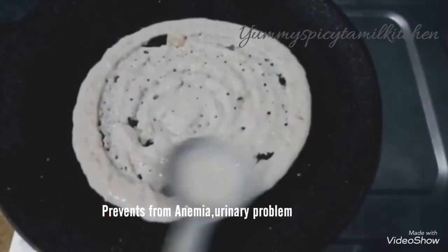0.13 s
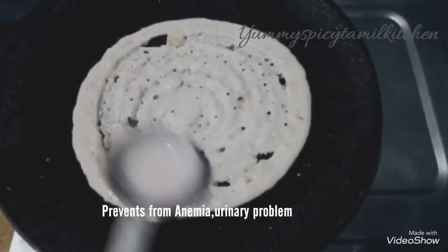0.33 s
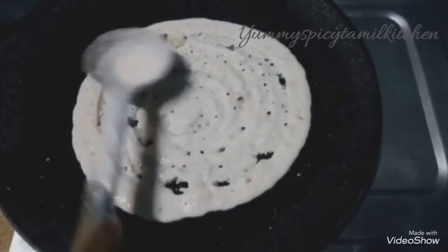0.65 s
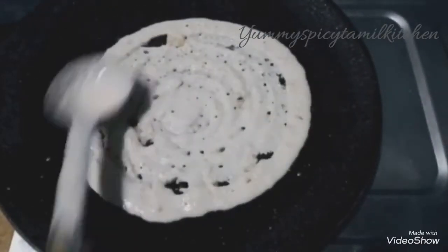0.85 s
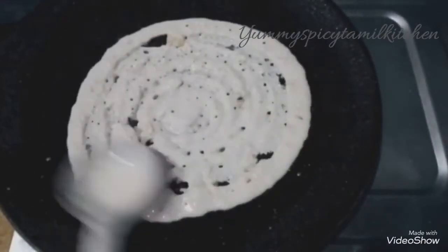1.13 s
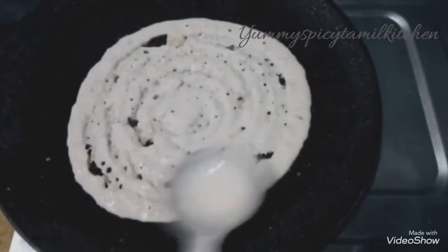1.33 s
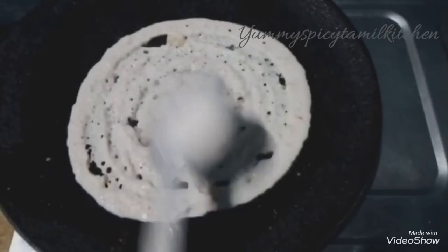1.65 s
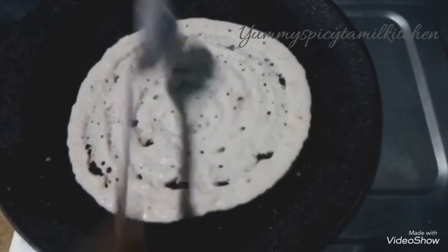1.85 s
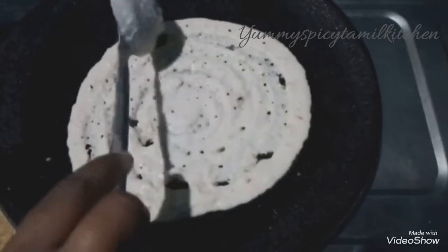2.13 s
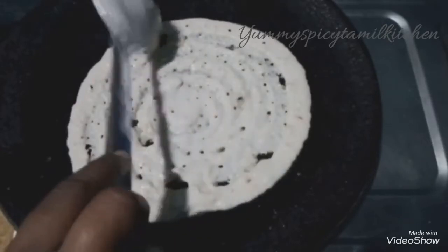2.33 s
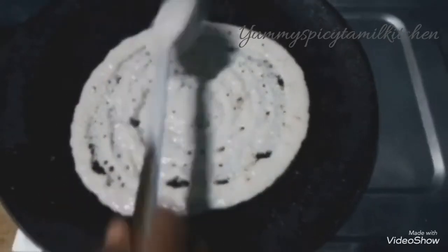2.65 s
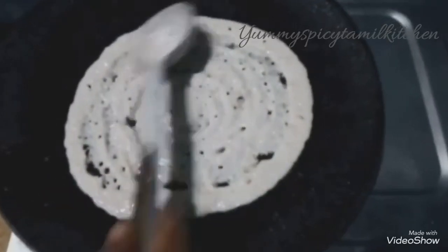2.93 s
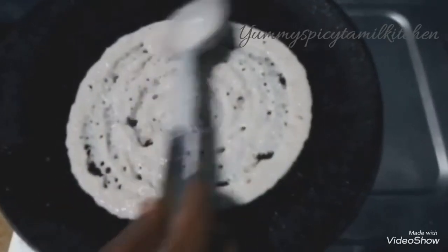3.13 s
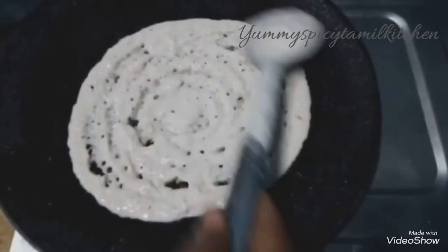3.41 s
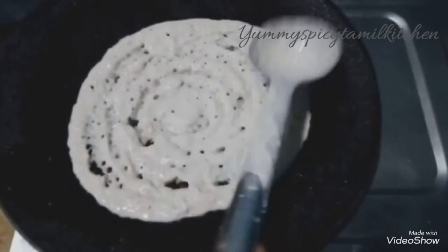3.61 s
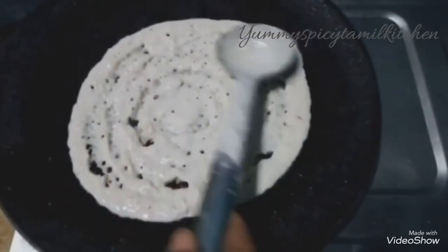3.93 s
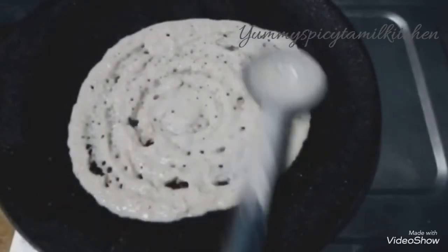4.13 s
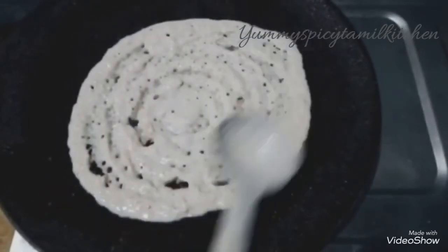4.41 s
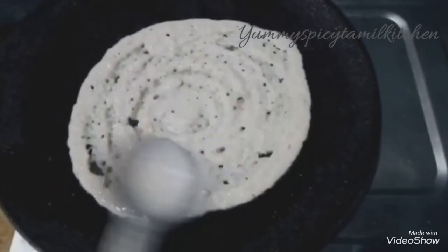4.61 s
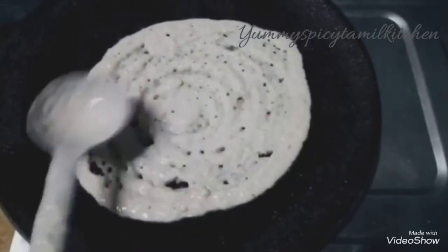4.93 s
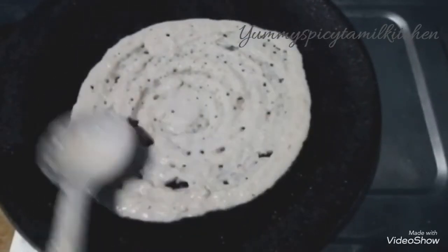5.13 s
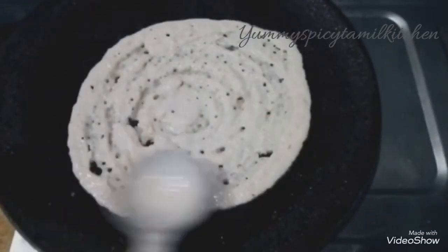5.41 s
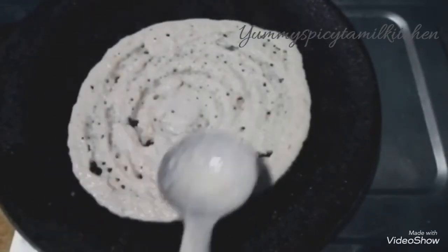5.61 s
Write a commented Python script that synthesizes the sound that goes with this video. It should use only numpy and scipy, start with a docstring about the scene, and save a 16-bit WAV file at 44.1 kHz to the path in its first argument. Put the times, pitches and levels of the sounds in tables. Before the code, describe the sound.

Wet batter sizzles on a hot flat pan, heard close in a kitchen: a dense, bright crackle of tiny bursting bubbles, dotted with sharp spits, over a faint low hum and rumble. It is strongest for the first second and a half, while a ladle spreads the batter in soft, wet, circling strokes and thin hisses swell and fade. At about 2 seconds the ladle comes to rest with a very soft, low rubbing groan and a short hiss. The sizzle then eases as the batter sets, breaking into separate pops, with brief lulls and flares between 3.4 and 4 seconds, where it dips low. Just after 4 seconds the ladle circles again, ringing softly as it rubs, and the sizzle revives. From about 5.2 seconds it sinks away with a few last spits, ending near 5.8 seconds.

```python
'''Close by in a kitchen, wet batter sizzles on a hot flat pan: thousands of tiny steam bubbles burst
each second, in clumps, over a faint hum and rumble. A ladle spreads it in circles while thin hisses
swell and fade, then rests with a soft groan at two seconds. The sizzle eases as the batter sets,
with spits, brief lulls and flares where it is pushed onto bare metal. After four seconds the ladle
circles again, ringing softly as it rubs, and the sizzle revives, then sinks away.'''
import sys
import numpy as np
from scipy import signal
from scipy.fft import rfft, irfft
from scipy.io import wavfile
from scipy.ndimage import uniform_filter1d

SR = 44100
rng = np.random.default_rng(int(sys.argv[2]) if len(sys.argv) > 2 else 0)


def transcribe(signal):
    """Save signal, clipped to [-1, 1], as a 16-bit WAV file at the path in sys.argv[1]."""
    frames = np.atleast_2d(signal).T
    limited = np.clip(frames, -1, 1)
    pcm = np.round(limited * 32767).astype(np.int16)
    wavfile.write(sys.argv[1], SR, pcm)


N = 254400
TIME = np.arange(N) / SR
CALM_DB = -40  # level of a calm sizzle

# The sizzle's slow envelope. Each row: time in seconds, level in dB.
SIZZLE_ENVELOPE = [(0, -35), (1.3, -36), (1.68, -38.5), (2.35, -38.5), (2.9, -41), (3.5, -41.5),
                   (3.68, -45.5), (3.87, -44), (3.98, -48), (4.35, -40), (4.72, -40.5), (4.91, -42.3),
                   (5.14, -41), (5.25, -43.5), (5.72, -44.5), (5.77, -50)]
# Tone of a bursting bubble. Each row: frequency in Hz, gain in dB.
BURST_EQ = [(150, -16.5), (450, -17), (700, -12), (1000, -7.5), (1400, -6), (1950, -5), (2400, -2.5),
            (4600, -0.5), (6700, 1), (7050, -1.5), (8100, -8), (12000, -11.5), (13700, -16), (14700, -9),
            (16000, -8)]
# Pan and stove colour every burst. Each row: centre in Hz, width in Hz, gain in dB.
PAN_RESONANCES = [(520, 20, 2), (929, 30, 5), (1117, 21, 3.5), (1400, 114, 4), (1550, 150, 3.5),
                  (1730, 120, 2.5), (2173, 53, 3), (2326, 99, 2), (2626, 360, 2.5), (2920, 87, 0.5),
                  (3220, 80, 0.5), (3713, 59, 4), (3960, 68, 1), (5560, 40, -2)]
# The finest spray, above 8 kHz. Each row: time in seconds, lift in dB.
SPRAY_LIFT = [(0, 1.1), (1.5, 1), (2.4, 3), (3.2, 1.5), (4.5, 0.5), (5.7, 0.8)]
# Batter meets bare metal. Each row: start in seconds, length in seconds, lift in dB.
SIZZLE_FLARES = [(1.734, 0.064, 2), (2.671, 0.063, 2), (3.735, .068, 4.5), (3.955, 0.01, 4.5),
                 (4.024, 0.033, 4), (4.218, 0.023, 2), (5.034, 0.024, 2)]
# The sizzle drops out for an instant. Each row: time in seconds, dip in dB before the rebound is added.
SIZZLE_LULLS = [(3.397, -15), (3.457, -17), (3.936, -15), (4.088, -8), (4.817, -4), (4.986, -5.5),
                (5.247, -21), (5.555, -13)]
# The loudest spits. Each row: time in seconds, level in dB, share below 3.2 kHz in dB.
LOUD_SPITS = [(.157, -32, -15), (.1636, -25.5, -18), (.7378, -31, -14), (.8112, -30, -4),
              (.9567, -30.5, -16), (1.4672, -29.5, -14), (1.6242, -28, -16), (2.1448, -28.5, -14),
              (2.4766, -31, -8), (2.792, -31, -7), (2.8552, -31.5, -20), (3.0197, -34, -3),
              (3.0955, -38, -14), (3.3256, -34, -4), (3.373, -32, -4), (3.4084, -31, -4.5),
              (3.5992, -28, -8.5), (3.6475, -32, -2.5), (3.7543, -35, -12), (3.7838, -40, -1),
              (3.9596, -39.5, 1), (4.025, -36, -9), (4.044, -33, -19), (4.2208, -38, -1), (4.5145, -30, -8),
              (4.9955, -33.5, -6.5), (5.0446, -34, -13), (5.1225, -33.5, -14), (5.1625, -33, -12),
              (5.207, -31, -22), (5.2574, -37, -10), (5.2822, -32, -4.5), (5.598, -35.5, -9),
              (5.6904, -35.5, -4.5)]
# Narrow bands of hiss. Each row: peak time and half length in seconds, centre in Hz, level in dB.
HISS_BANDS = [(0.65, .063, 6200, -39), (1.27, .12, 6650, -56), (1.3, 0.14, 3800, -52),
              (1.758, 0.025, 6300, -43), (1.975, .034, 5530, -39), (2.018, .024, 5200, -36.5),
              (2.174, .033, 6700, -49), (2.29, 0.046, 2800, -47), (3.22, 0.11, 6600, -47.5),
              (4.4, .12, 6050, -50), (4.515, 0.31, 3230, -52), (4.652, 0.17, 2300, -51.5),
              (5.072, .09, 5450, -46)]
# Ladle strokes through the batter. Each row: peak time and half length in seconds, level in dB.
LADLE_STROKES = [(.05, .35, -48), (0.797, 0.35, -52), (1.75, 0.3, -50), (3.245, 0.073, -58),
                 (4.48, .2, -60), (5.1, 0.33, -69)]
# Modes of the ladle's bowl. Each row: centre in Hz, width in Hz, relative gain in dB.
BOWL_MODES = [(1370, 150, -1.5), (2350, 340, -10.5), (2570, 110, -1), (3580, 140, -4), (3650, 56, -16)]
# The pan throbs under the ladle. Each row: peak time in seconds, level in dB.
PAN_THROBS = [(.23, -61), (1.42, -64), (1.55, -67), (2.38, -65), (2.547, -62.5), (2.875, -62.5),
              (3.73, -68), (4.61, -68), (5.31, -64)]
# The ladle's groan. Each row: centre in Hz, width in Hz, level in dB.
GROAN_BANDS = [(148, 20, -61.5), (514, 60, -62)]
# Tone of the rumble. Each row: frequency in Hz, relative gain in dB.
RUMBLE_EQ = [(20, -6), (60, -5.5), (100, 3.5), (150, 1.5), (250, -3), (500, -4.5), (1000, -6.5),
             (4000, -31)]
# Mains hum. Each row: frequency in Hz, level in dB.
HUM_PARTIALS = [(100, -80), (200, -78)]
# The kitchen's tail. Each row: frequency in Hz, time to fall 60 dB in seconds.
ROOM_DECAY = [(200, 0.41), (2000, 0.13), (7000, 0.25), (16000, 0.22)]


def sizzle():
    """Steam bubbles burst in clumps: dry snaps, short ticks and wet blips over a fine fizz."""
    level_db = sizzle_db() + flares_db()
    # a loud sizzle is dense and merges into hiss; a quiet one breaks into single pops
    crowd = amp(0.8 * (level_db - CALM_DB)) ** 2
    snaps = clicks(per_s=1900 * crowd, spread_db=4.5)
    snaps = unit_rms(snaps - uniform_filter1d(snaps, size=2001))
    ticks = grains(per_s=500 * crowd, spread_db=5.5, cycles=2.4, low_hz=3075, high_hz=7180)
    blips = grains(per_s=260 * crowd, spread_db=4.5, cycles=2.2, low_hz=950, high_hz=3150)
    # faint, brief tonal flecks at random pitches between 2 and 7 kHz
    flecks = grains(per_s=110 * crowd, spread_db=4.5, cycles=29, low_hz=2173, high_hz=6986, size=1400)
    fizz = crowd ** 0.66 * rng.standard_normal(N) * clumps(per_s=450, decay_s=0.002, depth_db=2)
    squeaks = grains(per_s=70 * crowd, spread_db=1.5, cycles=60, low_hz=1893, high_hz=7246, size=2600)
    texture = snaps + amp(-10.5) * ticks + amp(-12.5) * blips + amp(0.5) * unit_rms(fizz)
    texture += amp(-16) * flecks + amp(-13.5) * squeaks
    texture *= clumps(per_s=260, decay_s=0.003, depth_db=1.7) ** (crowd ** -0.2)  # lumpier when sparse
    texture = kitchen(eq(texture, burst_colour), near_db=-27, near_s=0.0065, room_db=-11)
    return bubble_balance(texture) * amp(level_db + lulls_db())


def grains(per_s, spread_db, cycles, low_hz, high_hz, size=400):
    """Brief tones at random pitches, each dying away over some cycles."""
    onsets = clicks(per_s, spread_db)
    at, step = np.flatnonzero(onsets)[:, None], np.arange(size)
    hz = rng.uniform(low_hz, high_hz, N)[at]
    turns = hz * step / SR
    rings = onsets[at] * np.sqrt(hz) * np.cos(2 * np.pi * turns) * np.exp(-turns / cycles)
    return unit_rms(np.bincount((at + step).ravel(), rings.ravel(), N)[:N])


def clicks(per_s, spread_db, outward_share=0.64):
    """Pressure spikes at random moments, mostly outward: many small, a few large."""
    strength = amp(spread_db * np.minimum(rng.exponential(1, N), 3.5))
    sign = np.where(rng.random(N) < outward_share, 1, -1)
    return sign * strength * (rng.random(N) < per_s / SR)


def clumps(per_s, decay_s, depth_db):
    """A gain that jumps at random and dies away, as when one burst sets off its neighbours."""
    kicks = rng.exponential(1, N) * (rng.random(N) < per_s / SR)
    activity = signal.lfilter([1], [1, -np.exp(-1 / (decay_s * SR))], kicks)
    return amp(depth_db * np.minimum(unit_rms(activity - activity.mean()), 3))


def burst_colour(hz):
    """EQ curve of one burst, coloured by the resonances of the pan."""
    pan_db = sum(db * resonance(hz, centre, width) for centre, width, db in PAN_RESONANCES)
    return amp(curve_at(BURST_EQ, hz) + pan_db)


def bubble_balance(texture, large_db=-7, wander_db=0.5):
    """A drifting blend of large, low bubbles and small, bright ones topped with fine spray."""
    large, small = crossover(texture)
    spray = crossover(small, hz=8000)[1]
    small += (amp(np.interp(TIME, *np.transpose(SPRAY_LIFT))) - 1) * spray
    share = np.clip(amp(large_db + wander_db * noise_band(0, width_hz=8.6)), 0, 0.95)
    return amp(-0.52) * share * levelled(large) + amp(0.05) * np.sqrt(1 - share ** 2) * levelled(small)


def sizzle_db():
    """The sizzle eases as the batter sets and revives when the ladle circles again."""
    return np.interp(TIME, *np.transpose(SIZZLE_ENVELOPE))


def flares_db(attack_s=0.0073, release_s=0.015):
    """Wet batter meets bare metal: the sizzle jumps up, holds and falls back."""
    attack = lambda s: np.clip((TIME - s) / attack_s, 0, 1)
    release = lambda s: np.exp(-np.maximum(TIME - s, 0) / release_s)
    return sum(db * attack(s) * release(s + length) for s, length, db in SIZZLE_FLARES)


def lulls_db(half_s=0.0051, rebound_after_s=0.0066, rebound_share=0.15):
    """Each lull is a sharp dip whose recovery is quickened by a small rebound."""
    dip = lambda s: np.exp(-abs(TIME - s) / half_s)
    return sum(db * (dip(s) - rebound_share * dip(s + rebound_after_s)) for s, db in SIZZLE_LULLS)


def spits(lead_s=0.00081, puff_db=2, puff_s=0.0019, burst_s=0.0013, size=2048):
    """A larger blister tears: one sharp snap inside a short puff of steam."""
    track = np.zeros(N)
    t = (np.arange(size) - size // 2) / SR
    rows = list(LOUD_SPITS) + small_spits()
    for (s, spit_db, low_db), noise in zip(rows, rng.standard_normal((len(rows), size))):
        puff = noise * (t > -lead_s) * np.exp(-abs(t + lead_s) / puff_s)
        tear = amp(puff_db) * unit_energy(puff)
        tear[size // 2] = 1  # the snap
        low, high = crossover(eq(tear, burst_colour))
        share = min(amp(low_db), 1)
        spit = unit_energy(share * unit_energy(low) + np.sqrt(1 - share ** 2) * unit_energy(high))
        add(track, s + t[0], amp(spit_db) * np.sqrt(burst_s * SR) * spit)
    return kitchen(track, near_db=-12.5, near_s=0.0046, room_db=-42)


def small_spits(per_s=7, over_db=2, spread_db=2, low_db=-10, low_spread_db=4):
    """Lesser spits at random moments ride the sizzle's level, in rows like those of LOUD_SPITS."""
    at = np.flatnonzero(rng.random(N) < per_s / SR)
    strength, body = rng.standard_normal((2, N))[:, at]
    level_db = sizzle_db()[at] + over_db + spread_db * strength
    return list(zip(TIME[at], level_db, low_db + low_spread_db * body))


def narrow_hisses(usual_width_hz=790, usual_db=-44):
    """Narrow bands of hiss swell and fade; those near 2.3 and 3.2 kHz are the rubbed ladle ringing."""
    hiss = sum(amp(db) * swell(s, half) * noise_band(hz, usual_width_hz * amp(db - usual_db))
               for s, half, hz, db in HISS_BANDS)  # a louder band is wider
    sputter = unit_rms(amp(1.7 * noise_band(0, width_hz=760)))
    return hiss * sputter


def ladle():
    """Wet, gritty friction stirs the damped modes of the ladle's bowl."""
    grit = rng.standard_normal(N) * clumps(per_s=220, decay_s=0.0025, depth_db=0.5)
    bowl = lambda f: sum(amp(db) * resonance(f, hz, width) for hz, width, db in BOWL_MODES)
    strokes = sum(amp(db) * swell(s, half) for s, half, db in LADLE_STROKES)
    return unit_rms(eq(grit, bowl)) * strokes


def pan_throbs(hz=103.3, half_s=0.045):
    """The pan throbs dully as the ladle drags over it."""
    return tone(hz) * sum(amp(db) * swell(s, half_s) for s, db in PAN_THROBS)


def ladle_groan(peak_s=2.03, half_s=0.078):
    """A soft, low groan as the ladle comes to rest."""
    groan = sum(amp(db) * levelled(noise_band(hz, width)) for hz, width, db in GROAN_BANDS)
    return swell(peak_s, half_s) * groan


def rumble(calm_level_db=-65, db_per_sizzle_db=0.52):
    """A low bed of noise that rises and falls with the sizzle."""
    bed = unit_rms(eq(rng.standard_normal(N), lambda f: amp(curve_at(RUMBLE_EQ, f))))
    return bed * amp(calm_level_db + db_per_sizzle_db * (sizzle_db() - CALM_DB))


def mains_hum():
    """A faint, steady hum with its octave."""
    return sum(amp(db) * tone(hz) for hz, db in HUM_PARTIALS)


def kitchen(x, near_db, near_s, room_db):
    """Pan and stove scatter each burst within milliseconds; the walls add a short tail."""
    t = np.arange(SR // 3) / SR
    near, far = rng.standard_normal((2, len(t)))
    near = near * np.exp(-t / near_s) * (t > 0.0004)
    hz, when, spectrum = signal.stft(far * (t > near_s), SR, nperseg=256)
    decay = amp(-60 * when / curve_at(ROOM_DECAY, hz)[:, None])
    tail = signal.istft(spectrum * decay, SR, nperseg=256)[1][:len(t)]
    echoes = amp(near_db) * unit_energy(near) + amp(room_db) * unit_energy(tail)
    return x + signal.fftconvolve(x, echoes)[:len(x)]


def amp(db):
    return 10 ** (np.asarray(db) / 20)


def unit_rms(x):
    return x / np.sqrt(np.mean(x ** 2) + 1e-20)


def unit_energy(x):
    return x / np.linalg.norm(x)


def levelled(x, size=3001):
    """Rides the gain to hold unit strength over about a tenth of a second."""
    return x / np.sqrt(abs(uniform_filter1d(uniform_filter1d(x ** 2, size), size)) + 1e-20)


def curve_at(points, hz):
    f, value = np.transpose(points)
    return np.interp(np.log(hz + 1), np.log(f + 1), value)


def eq(x, gain):
    """Filters x by gain(Hz) and keeps its transients sharp."""
    return irfft(rfft(x) * gain(np.fft.rfftfreq(len(x), 1 / SR)), len(x))


def crossover(x, hz=3200):
    """The parts below and above hz."""
    low = eq(x, lambda f: 1 / (1 + (f / hz) ** 10))
    return low, x - low


def resonance(hz, centre_hz, width_hz):
    return 1 / (1 + (2 * (hz - centre_hz) / width_hz) ** 2)


def noise_band(hz, width_hz):
    return unit_rms(eq(rng.standard_normal(N), lambda f: resonance(f, hz, width_hz)))


def tone(hz):
    return np.sqrt(2) * np.sin(2 * np.pi * (hz * TIME + rng.random()))


def swell(peak_s, half_s):
    return np.exp(-np.minimum(((TIME - peak_s) / half_s) ** 2, 20))


def add(mix, s, sound):
    part = mix[max(round(s * SR), 0):][:len(sound)]
    part += sound[:len(part)]


def scene():
    """The mono mix: sizzle, hisses and ladle over the low end, with spits on top."""
    cooking = sizzle() + narrow_hisses() + ladle()
    low_end = rumble() + pan_throbs() + ladle_groan() + mains_hum()
    return (cooking + low_end + spits())[None]


def record(dry):
    """A steep high cut at 15.78 kHz."""
    high_cut = signal.firwin(511, 15780, window=("kaiser", 9), fs=SR)
    return signal.oaconvolve(dry, high_cut[None], "same")


dry = scene()
out = record(dry)
transcribe(out)
```